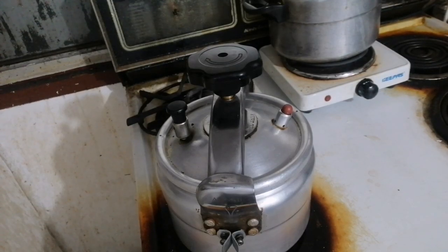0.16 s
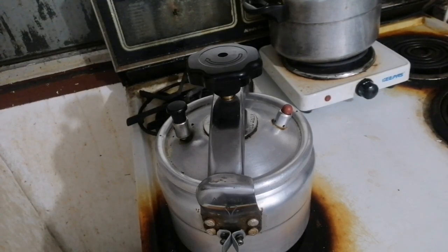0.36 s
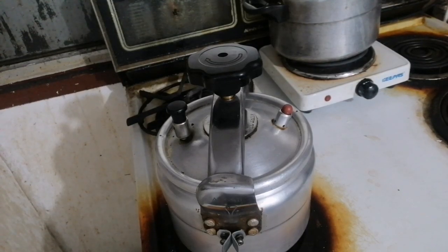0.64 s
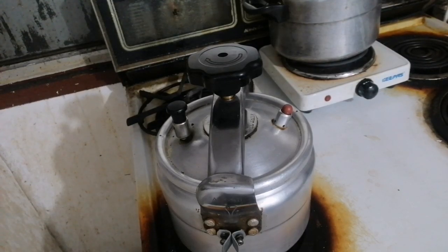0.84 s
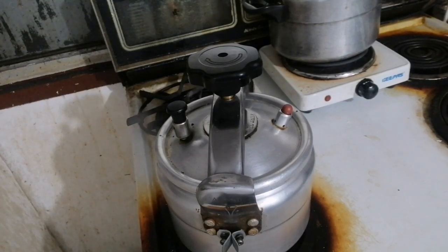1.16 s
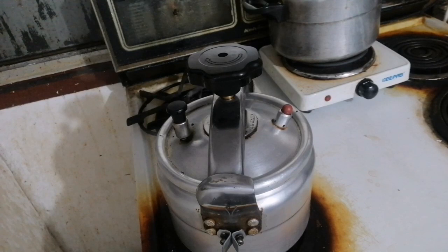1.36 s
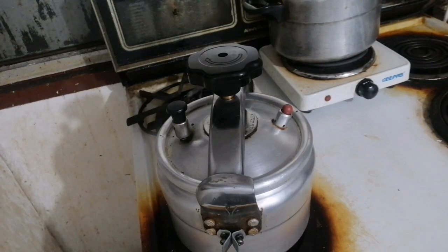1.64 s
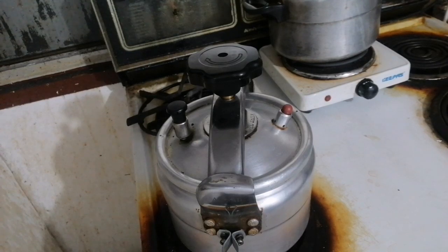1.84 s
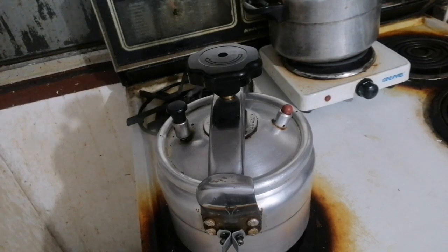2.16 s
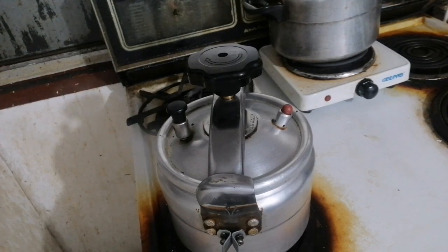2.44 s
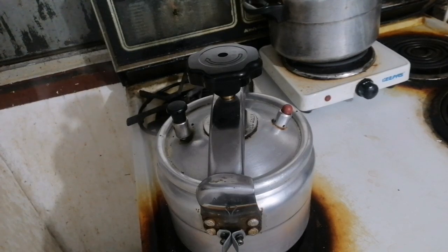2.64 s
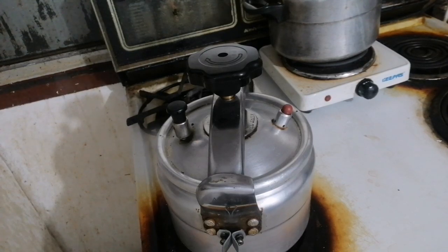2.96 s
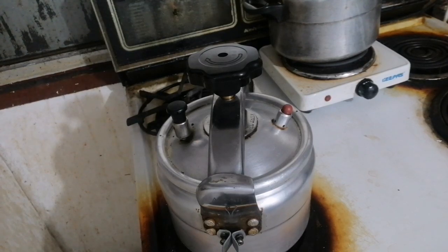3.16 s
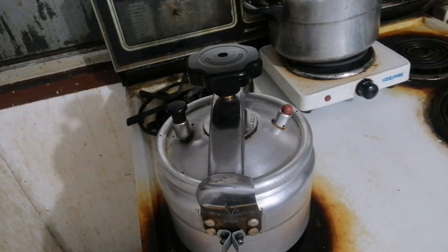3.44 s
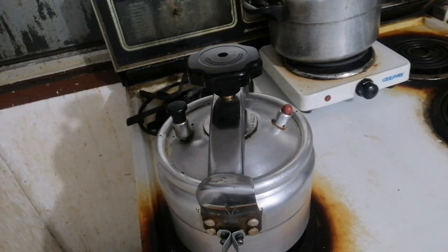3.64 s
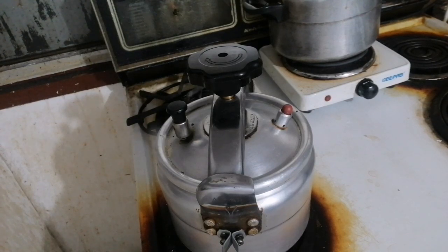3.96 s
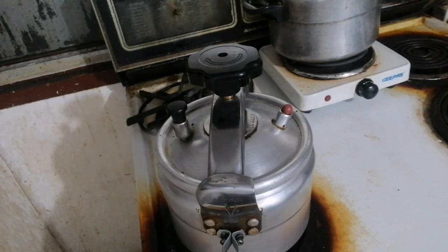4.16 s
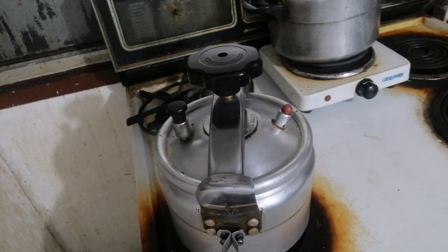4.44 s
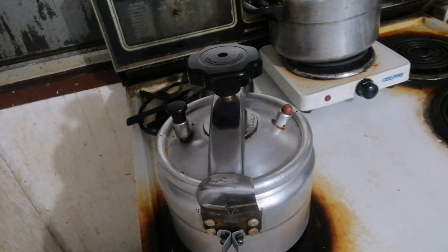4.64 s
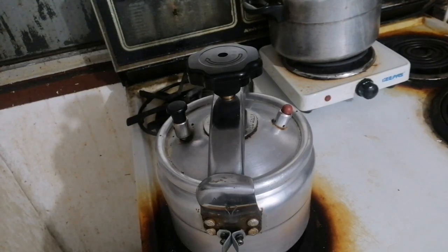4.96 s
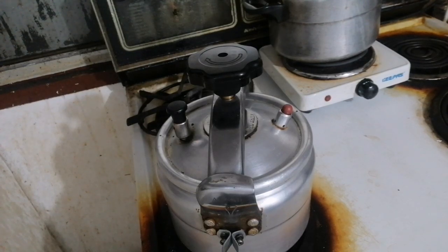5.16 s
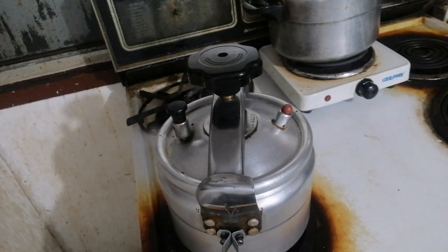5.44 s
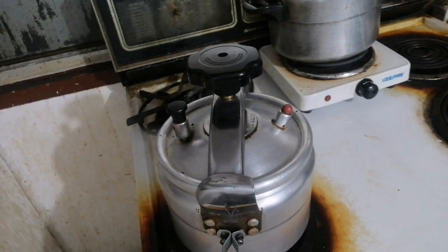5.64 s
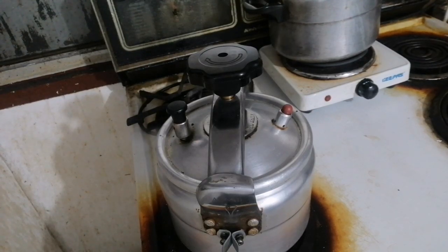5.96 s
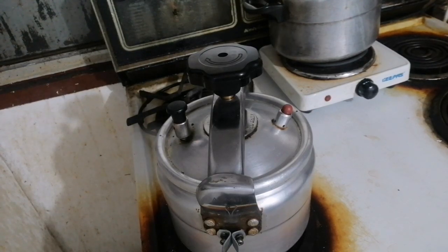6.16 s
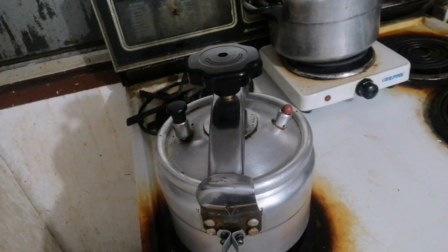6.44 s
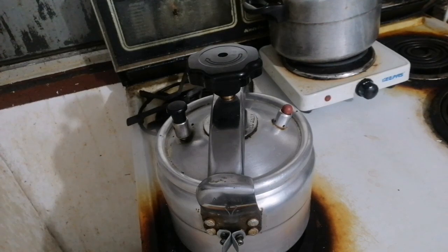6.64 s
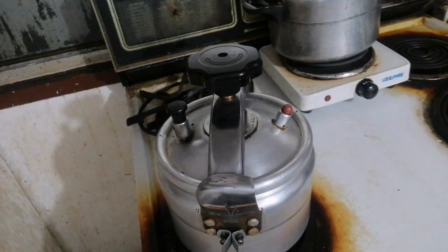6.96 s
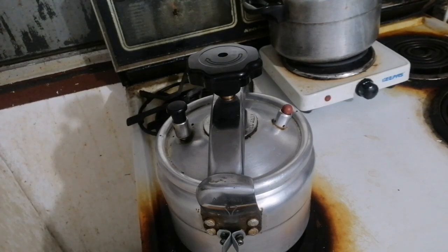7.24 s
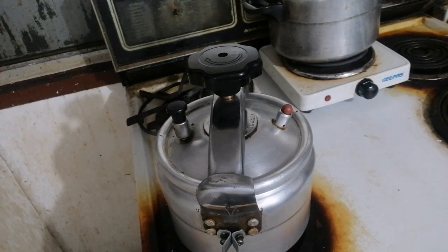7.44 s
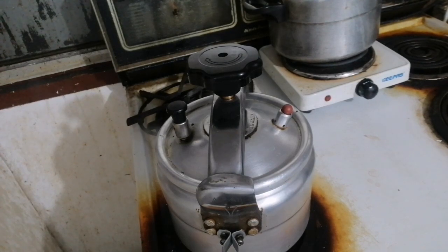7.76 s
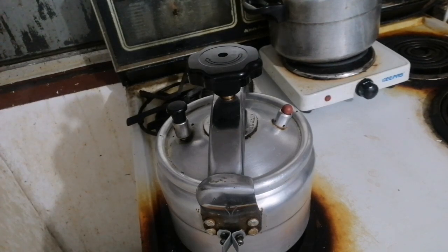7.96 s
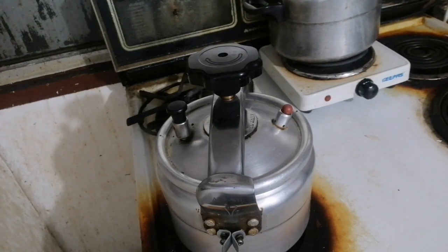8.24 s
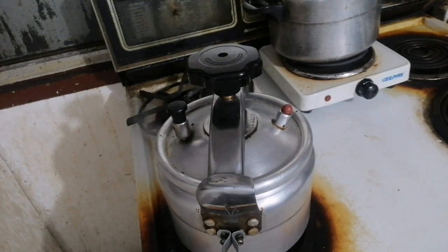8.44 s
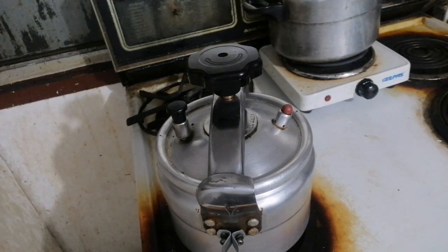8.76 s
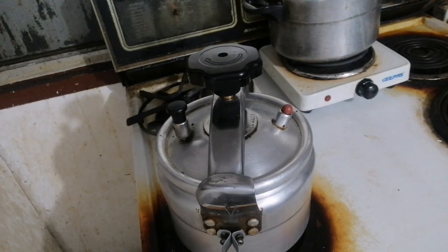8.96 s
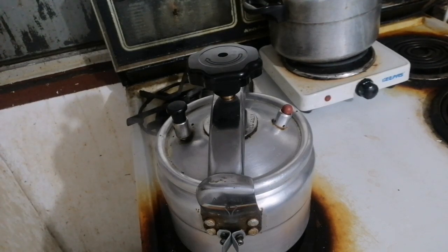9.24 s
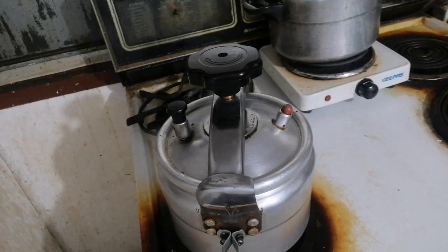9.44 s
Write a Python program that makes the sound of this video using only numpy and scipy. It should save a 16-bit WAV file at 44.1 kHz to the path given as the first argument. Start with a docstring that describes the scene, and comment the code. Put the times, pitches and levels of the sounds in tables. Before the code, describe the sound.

From 0 to about 9.6 seconds a pressure cooker on a stove vents a dense, steady jet of steam, recorded close in stereo in a small kitchen. The hiss is bright and sharp, strongest around 5 to 7 kHz on the left and about 9 to 10 kHz on the right, with little bass and no air above roughly 15 kHz. It flickers finely but holds its level, sinking only half a decibel. Far below, a faint rumble around 60 to 80 Hz surges irregularly. Tiny soft rustles pass near 1.1, 1.7, 2.8 to 3.0, 3.8, 5.7 and 8.3 to 9.3 seconds; the one at 2.8 is brighter. At about 3.3 seconds a dull, low knock lands with four fast fading bounces and a short diffuse room tail. From 8.2 seconds a very faint drone, about 250 to 470 Hz, swells and wavers until the end, nearly masked. The hiss continues to the cut.

```python
"""Pressure cooker venting, small kitchen, close

A pressure cooker on a stove vents a steady jet of steam, close to two microphone ports: noise, coloured at
each port by its own cavity resonance and by its own reflections from lid, stove and wall.
Far below the hiss: a low rumble (noise in the room's modes), brief rustles (puffs of band noise), a dull knock
with its bounces (decaying sines and a diffuse tail) and a faint drone (narrow noise wandering in pitch)."""
import sys
import numpy as np
from scipy import signal
from scipy.fft import rfft, irfft, next_fast_len
from scipy.io import wavfile

SR = 44100
rng = np.random.default_rng(int(sys.argv[2]) if len(sys.argv) > 2 else 0)


def log_audio(samples):
    """Write samples as a 16-bit WAV file to the path given in sys.argv[1]."""
    # one column per channel
    frames = np.atleast_2d(samples).T
    # limit to full scale, then quantise
    limited = np.clip(frames, -1, 1)
    pcm = np.round(limited * 32767).astype(np.int16)
    wavfile.write(sys.argv[1], SR, pcm)


N = 422919
FFT_SIZE = next_fast_len(N)
HZ = np.arange(FFT_SIZE // 2 + 1) * SR / FFT_SIZE + 1e-3   # kept just above zero for the logarithm


def from_db(db):
    """Decibels to gain."""
    return 10 ** (np.asarray(db) / 20)


def rms_one(x):
    """Scale to rms 1, all channels together."""
    return x / np.sqrt(np.mean(x ** 2) + 1e-20)


def in_time(rows):
    """Columns of a curve table, one value per sample."""
    s, *columns = np.transpose(rows)
    return [np.interp(np.arange(N) / SR, s, column) for column in columns]


def at_hz(points):
    """A spectrum table on the frequency grid, straight lines over log frequency."""
    hz, value = np.array(points).T
    return np.interp(np.log(HZ), np.log(hz), value)


def drift(corner_hz):
    """Slow random curve of rms 1: noise through two equal low-pass poles."""
    step = 40   # samples between computed points
    pole = np.exp(-2 * np.pi * corner_hz * step / SR)
    noise = rng.standard_normal(N // step + 2002)
    slow = signal.lfilter([1], [1, -2 * pole, pole ** 2], noise)[2000:]   # settled part only
    return np.interp(np.arange(N) / step, np.arange(len(slow)), rms_one(slow))


def resonance(x, hz, width):
    """Two-pole resonance of gain 1 on top."""
    r = np.exp(-np.pi * width / SR)
    zeros = np.array([1, 0, -1]) * (1 - r * r) / 2
    poles = [1, -2 * r * np.cos(2 * np.pi * hz / SR), r * r]
    return signal.lfilter(zeros, poles, x)


def double_resonance(x, hz, width):
    """The same resonance twice in a row, for steeper sides."""
    return resonance(resonance(x, hz, width), hz, width)


def at_ports(mid, side, side_gain):
    """Left and right port: a common part, and a side part of opposite sign."""
    return mid + side_gain * side * [[1], [-1]]


def port(colour, ripple, echo_db=-29, last_echo_s=.03):
    """Response of one port to the jet: colour, ripple, a comb of weak kitchen echoes, bass falling below 190 Hz."""
    db = at_hz(colour)
    for hz, width, gain_db in ripple:
        db = db + gain_db / (1 + (2 * (HZ - hz) / width) ** 2)
    lags = rng.uniform(.003, last_echo_s, size=12)
    echoes = sum(np.exp(-2j * np.pi * HZ * lag) for lag in lags)
    bass_cut = 1 / np.sqrt(1 + (190 / HZ) ** 4)
    return from_db(db) * (1 + from_db(echo_db) * echoes) * bass_cut


# level of the jet at each port: t/s, left level/dB, right level/dB
JET_LEVEL = [(0.0, -30, -29), (9.59, -30.5, -29.5)]
# broad colour of the jet at each port, before the level is set: f/Hz, relative level/dB per Hz
LEFT_COLOUR = [(200, -30), (500, -34), (1000, -33.5), (1900, -30), (2600, -12), (4300, -16.5), (5700, -2.5),
               (6800, -4), (7700, -17), (8800, -17), (10300, -14), (12500, -13), (14000, -13.5),
               (15200, -20)]
RIGHT_COLOUR = [(200, -31), (500, -34.5), (1000, -36), (1900, -35.5), (2600, -21.5), (4300, -20.5),
                (5700, -10), (6800, -14.5), (7700, -12.5), (8800, 3.5), (10300, -10), (12500, -12.5),
                (14000, -6), (15200, -22)]
# peaks and notches from the cavity and nearby reflections: f/Hz, width/Hz, level/dB
LEFT_PEAKS_AND_NOTCHES = [(842, 60, 3.0), (1554, 236, 2.5), (2085, 70, 3), (2427, 499, -9.0),
                          (2340, 150, 1.5), (2450, 60, -1.5), (2870, 70, 1.5), (3400, 200, 1.2),
                          (3950, 50, -1.8), (4640, 50, -2), (4755, 40, -1.8), (5100, 40, -2.2),
                          (14850, 150, -2), (15270, 150, -2.5), (2570, 120, 1.5), (2735, 471, -5.5),
                          (4547, 499, 8.9), (4633, 335, -9.0), (5745, 145, 2.2), (5765, 40, 1.5),
                          (6500, 194, 2.7), (7299, 499, 3.8), (7994, 402, 5.4), (9376, 258, 3.3),
                          (9644, 136, 3.9), (10461, 188, -2.7), (11044, 300, -3.3), (11473, 106, -4.2),
                          (11722, 237, 3.1), (11909, 499, -3.9), (14174, 341, -4.1), (14629, 499, 8.6),
                          (15070, 299, 9.0)]
RIGHT_PEAKS_AND_NOTCHES = [(1604, 499, 4.6), (2200, 100, -1.5), (445, 50, -1.5), (3700, 70, -1.5),
                           (3800, 70, 1.5), (4360, 40, -1.8), (6120, 60, -2), (14850, 400, 3.2),
                           (15090, 80, 2.5), (3080, 257, -5.0), (3518, 355, 9.0), (3573, 499, -8.6),
                           (4390, 217, -6.4), (5732, 499, -6.9), (6178, 341, -3.6), (6933, 85, 2.3),
                           (8232, 238, -4.3), (8513, 338, -8.1), (8857, 337, -6.8), (9478, 45, 2),
                           (9667, 45, 2), (9861, 48, 2.5), (10201, 442, 9.0), (10484, 60, -2.2),
                           (10748, 110, 3.3), (11242, 311, 6.2), (11675, 296, 4.2), (12152, 232, 3.2),
                           (13671, 499, -3.4), (14037, 281, -6.2), (15050, 244, 4.5)]
# likeness of the hiss at the two ports: f/Hz, likeness/0-1
PORT_LIKENESS = [(200, .6), (550, .6), (1000, .2), (1600, .5), (2250, .2), (2700, .7), (3100, .15),
                 (4500, .3), (6500, .5), (8400, .25), (10800, .45), (13300, .46), (15200, .35)]
# phase of the common hiss, right port ahead of left: f/Hz, phase/rad
RIGHT_PHASE_LEAD = [(200, 0), (3000, -.2), (3500, 1.2), (4600, 2.8), (5800, 1.9), (6100, 3.5), (7100, 4.3),
                    (7400, 5.9), (8300, 5), (9000, 4.4), (11800, 4.2), (12000, 5.2), (12200, 7.8),
                    (12700, 9.5), (13800, 10), (14050, 11.7), (14500, 10.2), (15200, 13)]


def steam(shared_db, own_db, slow_db):
    """Smooth jet noise, partly alike at both ports; its bands flicker a little together and a little alone."""
    alike = np.clip(at_hz(PORT_LIKENESS), 0, 1)
    common, other = rfft(rng.standard_normal((2, FFT_SIZE)))
    right_noise = alike * common * np.exp(1j * at_hz(RIGHT_PHASE_LEAD)) + np.sqrt(1 - alike ** 2) * other
    left = common * port(LEFT_COLOUR, LEFT_PEAKS_AND_NOTCHES)
    right = right_noise * port(RIGHT_COLOUR, RIGHT_PEAKS_AND_NOTCHES)
    both = np.array([left, right])

    flow = drift(11.0)
    out = np.zeros((2, N))
    band_place = np.clip(HZ / 750 - 1, 0, 19)   # band centres every 750 Hz
    for k in range(20):
        share = np.clip(1 - abs(band_place - k), 0, 1)   # overlapping bands that add up to the whole
        depth = min(1, (k + 1) / 4)   # the lows come back from the room and are smoother
        flicker_db = depth * (shared_db * flow + own_db * drift(24.6) + slow_db * drift(1.0))
        out += irfft(both * share, FFT_SIZE)[:, :N] * from_db(flicker_db)
    return np.array([rms_one(ch) * from_db(db) for ch, db in zip(out, in_time(JET_LEVEL))])


RUMBLE_LUMP_DB, RUMBLE_LUMP_CORNER_HZ = 0.6, 3.5   # the modes swell and sink, partly together
RUMBLE_UPPER_DB = 1.56   # the surges and the upper modes add this to the mean level
# level of the lowest rumble, before that addition and the port balance: t/s, level/dB
RUMBLE_LEVEL = [(0, -63.5), (.35, -61.5), (1.2, -62), (1.36, -71), (1.52, -58.5), (2.35, -61.5), (2.6, -57),
                (2.9, -62.5), (3.2, -57.5), (3.6, -60), (3.9, -63), (4.15, -59), (5.3, -59.5), (6.05, -68),
                (6.6, -60.5), (6.8, -67), (7.15, -58.5), (7.45, -65.5), (7.7, -62), (7.98, -59.5),
                (8.15, -65.5), (8.6, -62), (8.78, -63), (9.2, -63), (9.32, -65), (9.59, -60)]
# room modes the rumble stands in: f/Hz, width of each of two passes/Hz, relative level/dB,
# share of the level's swing/0-1
RUMBLE_MODES = [(32.6, 15, -12, .6), (60.9, 11, -1.5, 1.0), (76.7, 8.5, 2, 1.0), (97, 21, -9.5, .8),
                (124.3, 23, -10, 0.4), (157.2, 16.5, -5, .4), (189, 32, -12.5, 0.5)]


def rumble(side_db, side_rise_db):
    """Noise standing in the room's low modes, nearly alike at both ports, less so in the higher modes."""
    out = 0
    surge = drift(RUMBLE_LUMP_CORNER_HZ)
    level_db = in_time(RUMBLE_LEVEL)[0]
    mean_db = level_db.mean()
    for hz, width, db, follows in RUMBLE_MODES:
        mid, side = double_resonance(rng.standard_normal((2, N)), hz, width) / np.sqrt(width)
        apart = from_db(side_db + side_rise_db * max(0, np.log2(hz / 76)))   # rise per octave above 76 Hz
        lumps_db = RUMBLE_LUMP_DB * (surge + drift(RUMBLE_LUMP_CORNER_HZ))
        swing_db = follows * (level_db - mean_db)
        out = out + from_db(db + swing_db + lumps_db) * at_ports(mid, side, apart)
    balance = from_db([[.7], [-.7]])   # slightly stronger at the left port
    return from_db(mean_db + RUMBLE_UPPER_DB) * rms_one(out) * balance


# soft puffs of noise: t/s, length/s, centre f/Hz, width of each of two passes/Hz,
# level at the height of the puff before the side part joins/dB
RUSTLE_PUFFS = [(1.121, .11, 330, 300, -65), (1.68, .12, 700, 600, -64), (2.79, .15, 2690, 350, -50.5),
                (2.88, 0.1, 220, 160, -61), (3.04, 0.19, 780, 400, -63.5), (3.848, .14, 350, 300, -66),
                (5.739, .3, 247, 250, -65.5), (9.234, .2, 500, 1200, -60.5), (8.25, .48, 330, 200, -68),
                (9.3, .28, 420, 300, -71)]


def rustle(side_db):
    """Soft puffs of noise, each in one resonant band under a rounded swell."""
    out = np.zeros((2, N))
    for s, length, hz, width, db in RUSTLE_PUFFS:
        count, start = round(length * SR), round(s * SR)
        noise = double_resonance(rng.standard_normal((2, SR // 2)), hz, width)
        mid, side = rms_one(noise[:, -count:])   # the settled end
        puff = at_ports(mid, side, from_db(side_db)) * np.hanning(count)
        out[:, start:start + count] += from_db(db) * puff
    return out


def early_height(x):
    """Height of a sine as strong as the first 30 ms."""
    return np.sqrt(2 * np.mean(x[:, :round(.03 * SR)] ** 2))


BOUNCE_S, BOUNCE_LOSS_DB = .027, 6   # mean spacing and loss of each of four bounces
KNOCK_DULL_HZ, BOUNCE_DULLING = 760, .95   # corner of the first touch, its factor per bounce
# a dull knock, height of its first 30 ms taken as a sine: t/s, level/dB
KNOCK_TIMES = [(3.264, -44.5)]
# ring of the knocked thing, before dulling and chance: f/Hz, relative level/dB, t60/s
KNOCK_RING = [(178, -10, .15), (264, -6, 0.17), (375.5, 2.5, 0.11), (480, -7, 0.3), (551, 4.5, 0.11),
              (600, -3, .09), (640, -0.5, 0.13), (730, 1, 0.1), (817, 2, 0.06), (866, 5, 0.07),
              (1357, 6, .1)]


def knocks(contact_s):
    """Each touch is a soft rounded push into the same ringing modes; bounces are weaker and duller."""
    out = np.zeros((2, N))
    t = np.arange(SR // 2) / SR
    push = np.hanning(round(contact_s * SR))
    touches = []
    for s, db in KNOCK_TIMES:
        for k in range(5):
            unevenness = rng.uniform(-0.138, 0.148) * (k > 0)   # in bounce spacings
            dull_hz = KNOCK_DULL_HZ * BOUNCE_DULLING ** k
            touches.append((s + BOUNCE_S * (k + unevenness), db - BOUNCE_LOSS_DB * k, dull_hz))
    for s, db, dull_hz in touches:
        sound = 0
        for hz, level_db, t60 in KNOCK_RING:
            shape = np.convolve(from_db(-60 * t / t60), push)[:len(t)]   # swells while the contact lasts
            chance_db = rng.normal(0, 1.6, (2, 1))   # its own at each port
            strength = from_db(level_db + chance_db) / (1 + (hz / dull_hz) ** 4)
            sound = sound + strength * shape * np.sin(2 * np.pi * (hz * t + rng.random()))
        start = round(s * SR)
        out[:, start:start + len(t)] += from_db(db) * sound / early_height(sound)
    return out


KNOCK_ROOM_DB, KNOCK_ROOM_T60_S = -9, 0.84   # start of the tail relative to the knock
KNOCK_ROOM_HZ, KNOCK_ROOM_WIDTH_HZ = 540, 560   # width of each of two passes


def knock_tail():
    """The room answers each knock with dull diffuse noise that dies away, its own at each port."""
    t = np.arange(N) / SR
    envelope = 0
    for s, db in KNOCK_TIMES:
        decay = from_db(db + KNOCK_ROOM_DB - 60 * np.abs(t - s) / KNOCK_ROOM_T60_S)
        onset = np.clip((t - s) / .015, 0, 1)   # silent before the knock, 15 ms rise
        envelope = envelope + decay * onset
    noise = double_resonance(rng.standard_normal((2, N)), KNOCK_ROOM_HZ, KNOCK_ROOM_WIDTH_HZ)
    return rms_one(noise) * envelope


DRONE_WANDER_HZ, DRONE_FLUTTER_DB = 10, 3   # rms of the random pitch and level
# overlapping swells of the faint drone: start t/s, rise/s, hold/s, fall/s, middle f/Hz,
# level before flutter and side part/dB
DRONE_SWELLS = [(8.25, .15, .2, .12, 311.5, -71.5), (8.28, .2, .27, .15, 388, -66.5),
                (8.702, 0.085, 0.11, .15, 346, -67), (9.13, 0.048, 0.053, .06, 370, -65),
                (9.3, 0.046, .12, .1, 468, -71), (9.3, 0.27, .2, .1, 388, -64.5),
                (8.2, .25, .35, .25, 250, -77), (8.38, .06, .08, .08, 345, -71),
                (8.9, .04, .07, .1, 375, -69)]


def drone(width_hz, side_db):
    """Slow noise turned up to a wandering pitch makes narrow bands that swell in from afar."""
    out = 0
    t = np.arange(N) / SR
    low_pass = signal.butter(2, width_hz, fs=SR, output="sos")
    for s, rise, hold, fall, hz, db in DRONE_SWELLS:
        end = s + rise + hold + fall
        swell = np.clip(np.minimum((t - s) / rise, (end - t) / fall), 0, 1)
        slow = signal.sosfilt(low_pass, rng.standard_normal((2, 2, N)))
        phase = 2 * np.pi * np.cumsum(hz + DRONE_WANDER_HZ * drift(2.5)) / SR
        mid, side = rms_one(slow[0] * np.cos(phase) + slow[1] * np.sin(phase))
        flutter = from_db(db + DRONE_FLUTTER_DB * drift(5.5))
        out = out + at_ports(mid, side, from_db(side_db)) * swell * flutter
    return out


def scene():
    """Steam over the faint sounds of the room."""
    hiss = steam(shared_db=0.09, own_db=1.06, slow_db=0.22)
    low = rumble(side_db=-20.0, side_rise_db=6.5)
    knocking = knocks(contact_s=0.014) + knock_tail()
    return hiss + low + rustle(side_db=-5) + knocking + drone(width_hz=27, side_db=-7)


CUTOFF_HZ = 15450


def record(dry):
    """A steep elliptic low-pass ends the sound at 15450 Hz."""
    low_pass = signal.ellip(14, .3, 80, CUTOFF_HZ, fs=SR, output="sos")   # .3 dB ripple, 80 dB down
    return signal.sosfilt(low_pass, dry)


dry = scene()
out = record(dry)
log_audio(out)
```